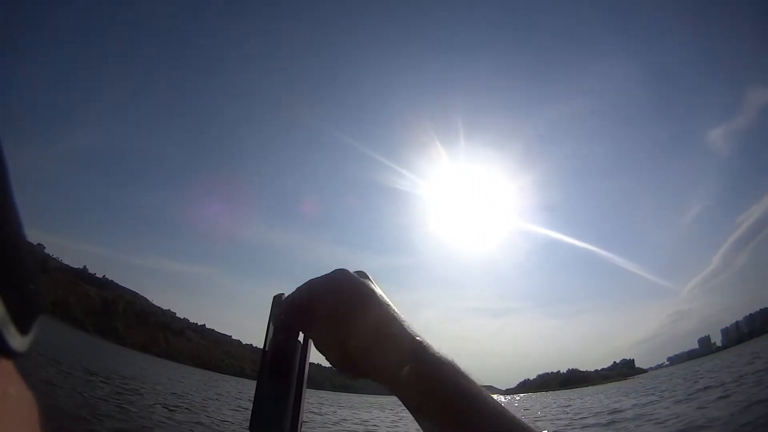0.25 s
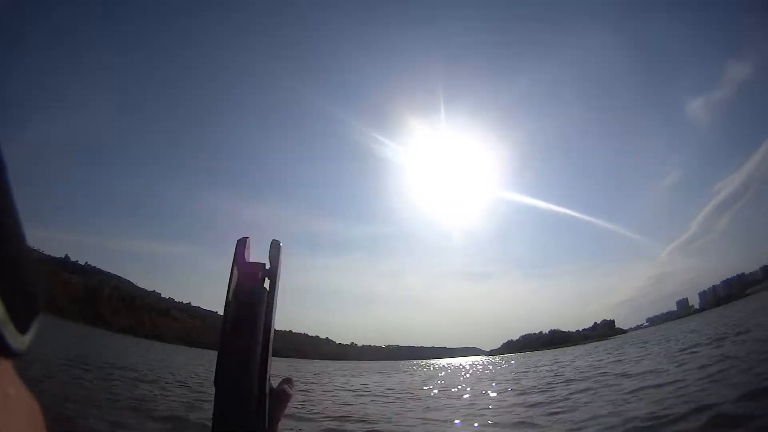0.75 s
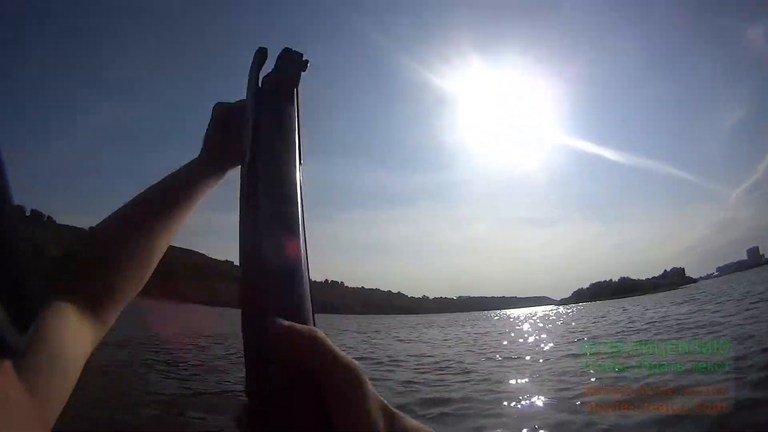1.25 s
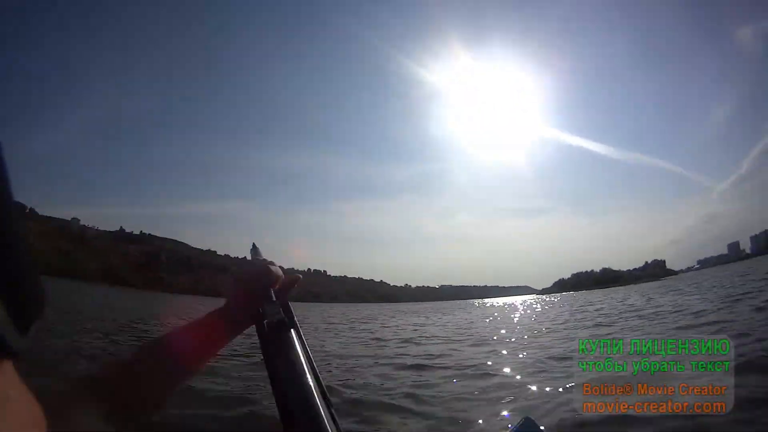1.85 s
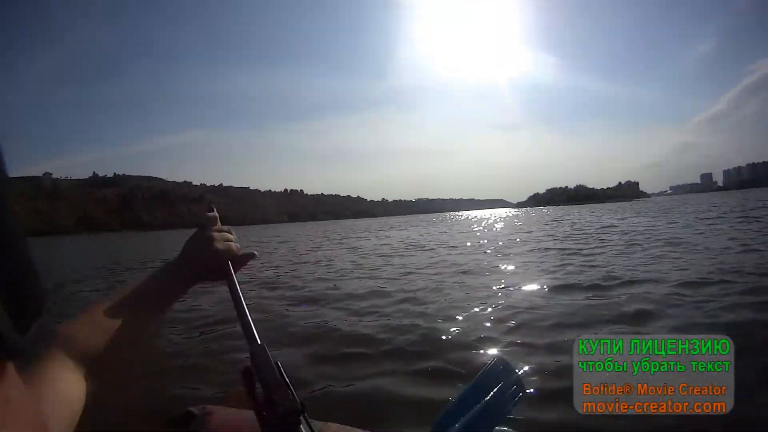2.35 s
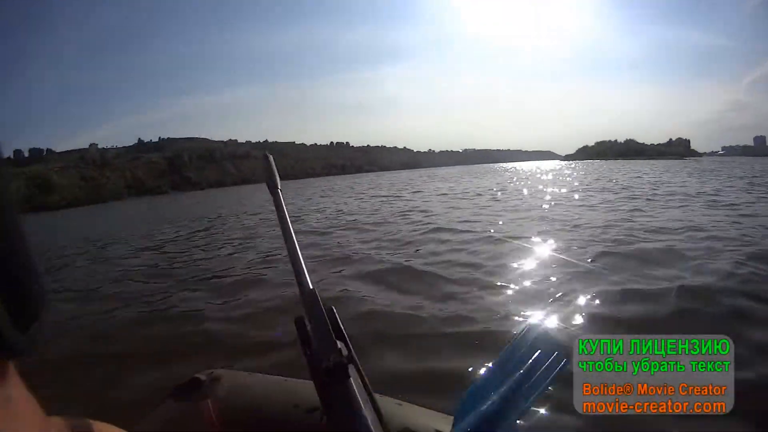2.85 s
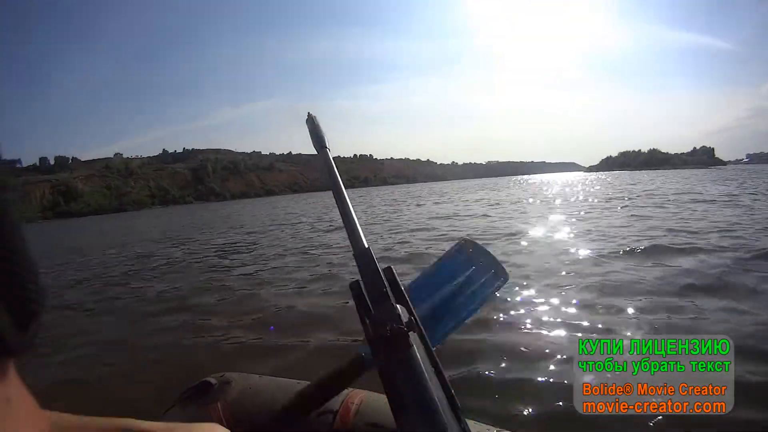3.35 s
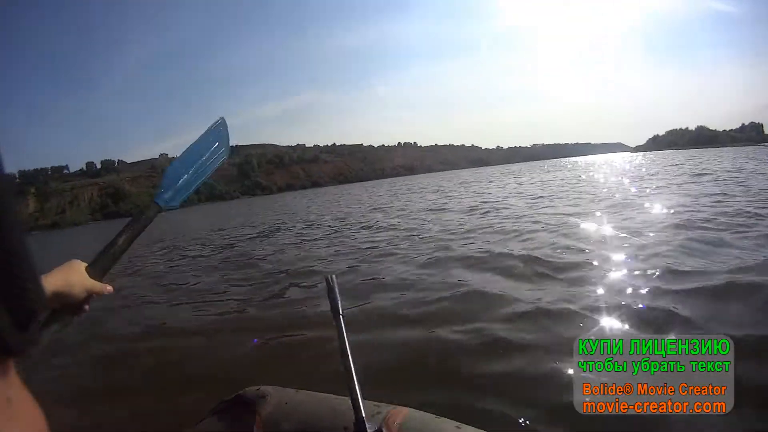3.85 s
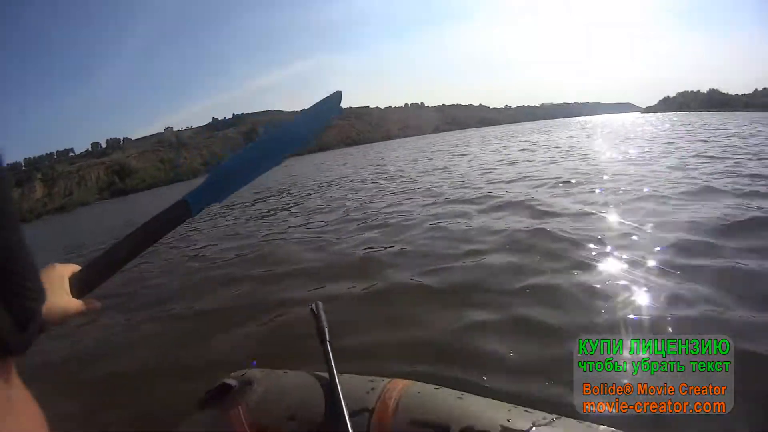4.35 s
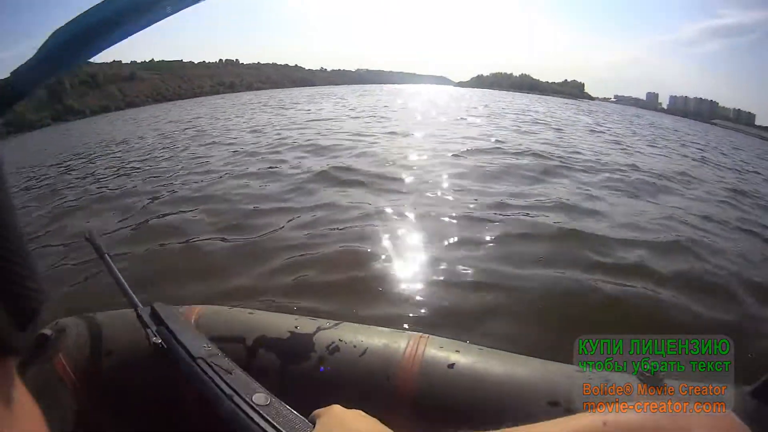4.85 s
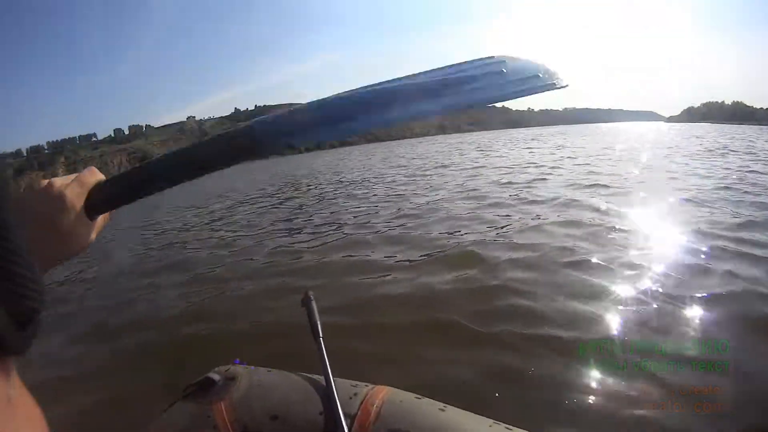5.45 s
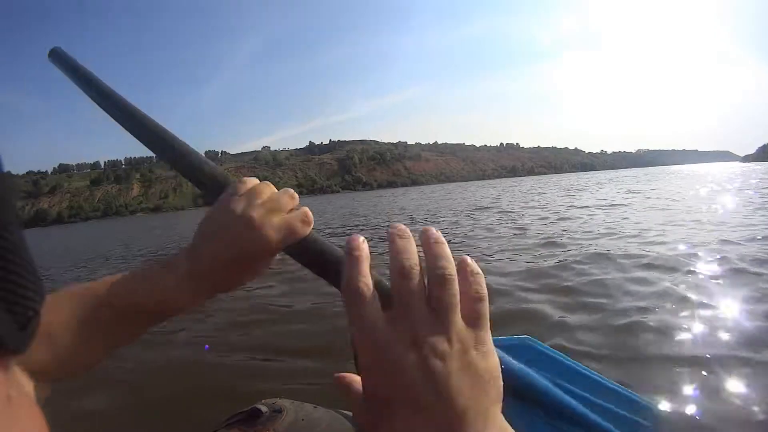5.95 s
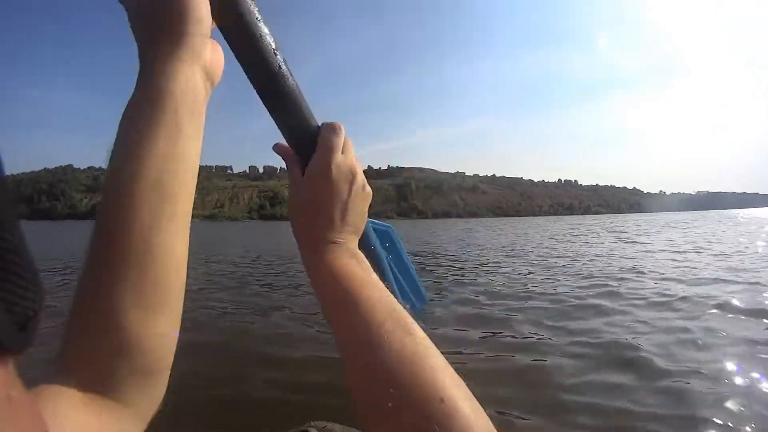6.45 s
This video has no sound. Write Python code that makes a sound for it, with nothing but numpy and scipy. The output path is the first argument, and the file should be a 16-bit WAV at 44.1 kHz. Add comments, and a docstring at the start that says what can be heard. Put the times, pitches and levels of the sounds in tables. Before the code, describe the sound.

A break-barrel rifle scrapes, snaps and clatters near the microphone on calm open water, followed by faint rubbing hands and soft hollow oar taps.

```python
"""First a faint hiss of open air, lapping ripples and a low hull rumble, in an inflatable boat on calm water.
Hands rub on gear, thin faint high tones flicker briefly, and close by a break-barrel air rifle is cocked,
snapped shut and laid on the hull: filtered noise bursts ring its steel modes, dense grains make the scrapes.
Then a plastic oar knocks lightly. Low thumps of the air tubes and the low body of some knocks are decaying
sines; air, water and rumble are shaped noise. All is heard at the two ports of a small head-worn camera."""
import sys
import numpy as np
from scipy import signal
from scipy.fft import rfft, irfft
from scipy.io import wavfile
from scipy.ndimage import uniform_filter1d

SR = 44100
rng = np.random.default_rng(int(sys.argv[2]) if len(sys.argv) > 2 else 0)


def bounce(signal):
    """Save signal as a 16-bit WAV file at the path given by the first command-line argument."""
    frames = np.transpose(np.atleast_2d(signal))
    limited = np.clip(frames, -1, 1)
    pcm = np.round(limited * 32767).astype(np.int16)
    wavfile.write(sys.argv[1], SR, pcm)


N = 295625
SIZE = 8192  # samples in one short event


def undb(db):
    """Decibels to gain."""
    return 10 ** (np.asarray(db) / 20)


def unit(x):
    """Scale to rms 1."""
    return x / np.sqrt(np.mean(x ** 2))


def freqs(size):
    """Frequencies in Hz of the bins of a spectrum, kept above zero for the log axis."""
    return np.maximum(np.fft.rfftfreq(size, 1 / SR), 1)


def across(rows, hz, axis=1):
    """One column of a table, read on a log-frequency axis."""
    rows = np.array(rows)
    return np.interp(np.log(hz), np.log(rows[:, 0]), rows[:, axis])


def add(out, s, x):
    """Mix a sound in at time s."""
    start = int(s * SR)
    out[..., start:start + x.shape[-1]] += x[..., :N - start]


def walk(rate):
    """Random levels drawn at this rate in Hz and smoothed twice, scaled to a spread near 1."""
    hold = int(SR / rate)
    steps = np.repeat(rng.standard_normal(N // hold + 1), hold)
    smooth = uniform_filter1d(uniform_filter1d(steps, hold), hold)
    return unit(smooth[:N])


def swells(rows, rise, point):
    """Gain over time of movements (t/s, length/s, level/dB) that build and ease; overlaps add in power.

    rise is the share of time spent building; point is the shape, 0 flat and 1 a sine arch.
    """
    power = np.zeros(N)
    for s, length_s, db in rows:
        t = np.arange(int(length_s * SR)) / SR
        progress = np.interp(t, [0, rise * length_s, length_s], [0, .5, 1])
        arch = abs(np.sin(np.pi * progress)) ** point
        add(power, s, (undb(db) * arch) ** 2)
    return np.sqrt(power)


def soft_pulse(level_db, peak_s):
    """A push that peaks at level_db after peak_s, then dies away with that same time constant."""
    t = np.arange(SIZE) / SR
    return undb(level_db) * t / peak_s * np.exp(1 - t / peak_s)


def grains(rate):
    """Dense tiny slips of uneven size, rate per second on average."""
    sizes = undb(2 * np.minimum(rng.exponential(size=N), 4))
    happens = rng.random(N) < rate / SR
    return unit(happens * sizes * rng.standard_normal(N))


# how alike diffuse sound is at the two microphone ports: f/Hz, correlation
PORT_LIKENESS = [(60, 0.89), (130, 0.83), (260, -0.084), (550, -0.48), (1160, -0.45), (2440, -0.29),
                 (5100, 0.2), (10700, 0.62)]


def diffuse(gain):
    """Coloured noise from all round the microphone, its two ports partly alike at each frequency."""
    likeness = across(PORT_LIKENESS, freqs(N))
    mid, side = rfft(rng.standard_normal((2, N))) * gain * np.sqrt([1 + likeness, 1 - likeness])
    return unit(irfft([mid + side, mid - side], N))


# a close source at the two microphone ports: f/Hz, left minus right level/dB, left lead/rad
NEAR_PORTS = [(150, -4, -0.88), (342, 0, -0.85), (614, 1, -1.92), (1160, -10, -1.37), (1890, -7, -0.64),
              (3120, 0.5, -0.61), (5960, -1.5, -0.59), (10700, 2, -0.93)]


def ports(hz):
    """Left and right response to a source just in front of the camera."""
    half_gain = undb(across(NEAR_PORTS, hz, axis=1) / 2)
    half = half_gain * np.exp(1j * across(NEAR_PORTS, hz, axis=2) / 2)
    return np.array([half, 1 / half]) / np.sqrt((abs(half) ** 2 + abs(half) ** -2) / 2)


def near(x, gain, apart):
    """Colour a close source and carry it to both ports, partly (apart) by unrelated paths."""
    scattered = rfft(abs(x) * rng.standard_normal((2, N)))
    arriving = rfft(x) * ports(freqs(N)) + apart * scattered
    return unit(irfft(arriving * gain, N))


def resonance(modes, hz):
    """Gain of a body whose modes (f/Hz, width/Hz, level/dB) add in power."""
    return np.sqrt(sum(undb(db) ** 2 / (1 + (2 * (hz - f) / width) ** 2) for f, width, db in modes))


def causal(gain):
    """The minimum-phase response with this gain: it rings only after it is struck."""
    cepstrum = irfft(np.log(gain + 1e-9))
    cepstrum[1:SIZE // 2] *= 2
    cepstrum[SIZE // 2 + 1:] = 0
    return np.exp(rfft(cepstrum))


def contact(decay_s, rise_s):
    """A broadband burst of micro-impacts that builds as two surfaces meet and dies as they settle."""
    t = np.arange(SIZE) / SR
    fade = np.exp(-t / decay_s) * (1 - np.exp(-t / rise_s))
    burst = rfft(rng.standard_normal(SIZE) * fade)
    flat = irfft(burst / (abs(burst) + 1e-9))  # equal strength at every frequency
    return unit(flat * np.sqrt(fade))


# edges between a blow's thud, knock, ring, snap and tick: f/Hz
BAND_EDGES = [150, 700, 1450, 3500, 6500, 11000]


def blow_bands(db, centre_hz, fall_db, thud_db, crown_octaves=.48):
    """Share a blow's level among the bands: a round-topped hump, higher up for a harder contact."""
    middles = np.sqrt(np.multiply(BAND_EDGES[:-1], BAND_EDGES[1:]))
    hump = undb(-fall_db * np.hypot(np.log2(middles / centre_hz), crown_octaves))
    hump[0] *= undb(thud_db)
    return undb(db) * hump / np.linalg.norm(hump)


def strike(blows, modes, thud_db, spot_db, contrast, rise, scatter_db, scatter_s, apart,
           tail_db, tail_s, tail_hz):
    """Each contact rings the body; the boat scatters it back; its hardness sets each band's strength."""
    out, hz, t = np.zeros((2, N)), freqs(SIZE), np.arange(SIZE) / SR
    peaks = np.array([resonance([mode], hz) ** 2 for mode in modes])
    bands = list(zip(BAND_EDGES, BAND_EDGES[1:]))
    # level inside each band, sliding to the next around their shared edge
    corners = np.log(np.array(bands) * [1.1, 1 / 1.1]).ravel()
    for s, decay_s, db, centre_hz, fall_db in blows:
        # each spot struck favours some modes; contrast deepens peaks and gaps
        weights = undb(spot_db * rng.standard_normal(len(modes))) ** 2
        body = causal(np.sqrt(weights @ peaks) ** contrast) * ports(hz)
        # first reflections share a part at both ports; later ones are duller and unrelated
        noise = rng.standard_normal((5, SIZE))
        early_noise = noise[0] + apart * noise[1:3]
        early = undb(scatter_db) * unit(early_noise * t * np.exp(-t / scatter_s))
        late = undb(tail_db) * unit(noise[3:] * np.exp(-t / tail_s))
        dull_late = rfft(late) / (1 + 1j * hz / tail_hz)
        ring = (rfft(contact(decay_s, rise * decay_s) + early) + dull_late) * body
        # band rms, averaged over the ports, as if the energy lasted 10 ms
        energy = [np.sum(abs(ring[:, (hz >= lo) & (hz < hi)]) ** 2) / SIZE for lo, hi in bands]
        rms = np.sqrt(np.array(energy) / (SR / 100))
        steps = np.log(blow_bands(db, centre_hz, fall_db, thud_db) / rms)
        colour = np.exp(np.interp(np.log(hz), corners, np.repeat(steps, 2)))
        low_cut = 1 + (BAND_EDGES[0] / hz) ** 3
        add(out, s, irfft(ring * causal(colour / low_cut)))
    return out


# colour of the open air, before scaling: f/Hz, relative level/dB
AIR_COLOUR = [(59, -32), (100, -4.5), (224, -5), (345, -5.5), (373, -4.5), (412, -4.5), (1120, -7.5),
              (1290, -6), (1870, -10.5), (3120, -10.5), (3450, -13.5), (5110, -15.5), (11000, -21),
              (14300, -105), (22000, -120)]


def air():
    """Open air over the water: a smooth, faint hiss from all round, its level drifting slightly."""
    level_db = -56 + 0.25 * walk(2.66)
    return undb(level_db) * diffuse(undb(across(AIR_COLOUR, freqs(N))))


# the boat rocking as weight shifts: t/s, length/s, rumble level/dB, lapping level/dB
BOAT_ROCKS = [(0., .75, -69, -70), (0.797, 0.71, -62.5, -57.5), (1.44, 0.35, -60, -56),
              (1.78, 0.56, -63, -57.5), (2.284, .32, -55, -55), (2.8, 0.52, -64.5, -58.5),
              (3.6, 0.51, -78, -65), (4.394, 0.21, -61.5, -66), (4.6, 1.2, -69, -60),
              (6.05, .4, -74, -62.5)]


def rocking(column, calm_db):
    """Swelling gain of one column of the rocking, joined in power to the calm level between rocks."""
    rows = [(row[0], row[1], row[column]) for row in BOAT_ROCKS]
    return np.hypot(undb(calm_db), swells(rows, rise=0.39, point=0.72))


# sloshes pushed out by the rocking hull: t/s, peak level/dB, time to peak and decay/s
HULL_SLOSHES = [(1.5, -56, 0.025), (1.572, -51, 0.015), (1.591, -50.5, .014), (2.362, -55, 0.015),
                (2.398, -50, 0.0091), (2.545, -54, 0.011), (5.245, -54.5, 0.0093)]
# colour of water close under the hull, before scaling: f/Hz, relative level/dB
WASH = [(100, -17), (300, -5.0), (650, 2.5), (1000, 1.5), (1280, 4.5), (1700, -2.5), (2400, -12.5),
        (5000, -25), (11000, -27)]


def water():
    """Ripples lap all round as flickering noise, and close sloshes burst in dense grains."""
    gain = undb(across(WASH, freqs(N)))
    surge = np.zeros(N)
    for s, db, peak_s in HULL_SLOSHES:
        add(surge, s, soft_pulse(db, peak_s))
    flicker = undb(0.85 * walk(18))
    ripples = rocking(column=3, calm_db=-65.5) * flicker * diffuse(gain)
    return ripples + surge * near(grains(rate=3000), gain, apart=0.17)


# low thumps of the air tubes and the low body of some knocks:
# t/s, f/Hz, envelope peak level/dB, time to peak and decay/s
LOW_THUMPS = [(1.588, 36, -48, 0.012), (1.621, 37.7, -45.5, 0.0078), (1.82, 49.3, -49.5, 0.0059),
              (1.835, 400, -49, .002), (1.978, 35, -48, 0.013), (2.326, 287, -40.5, 0.0027),
              (2.351, 42, -44, 0.015), (2.399, 45.4, -37, 0.0059), (4.955, 175, -52, 0.0056),
              (5.193, 178, -58, 0.0077)]
# colour of the hull's rumble, before scaling: f/Hz, relative level/dB
RUMBLE = [(10, -10), (25, -6), (38, -2.5), (55, -8.0), (90, -9), (140, -25), (300, -42), (1000, -86)]


def hull():
    """Decaying sines thump for the air tubes and the low body of some knocks; low noise swells as rumble."""
    thumps, t = np.zeros(N), np.arange(SIZE) / SR
    for s, hz, db, peak_s in LOW_THUMPS:
        add(thumps, s, -soft_pulse(db, peak_s) * np.sin(2 * np.pi * hz * t))
    rumble = diffuse(undb(across(RUMBLE, freqs(N))))
    return thumps + rocking(column=2, calm_db=-67) * rumble


# hands and sleeves rubbing on close gear, a row a stroke: t/s, length/s, level/dB before trim
RUB_STROKES = [(.365, 0.058, -59.5), (1.78, 0.25, -55), (2.785, 0.092, -56.5), (2.89, 0.14, -58.5),
               (3.03, 0.24, -63), (3.6, 0.73, -60), (4.35, .42, -57), (4.93, 0.57, -56.5), (6.5, 0.32, -60)]
# a palm sliding down the oar shaft: t/s, length/s, level/dB before trim
PALM_SLIDES = [(6.03, 0.084, -56.5), (6.12, 0.2, -54.5)]
# colours of the rubbing and of the sliding palm, before scaling: f/Hz, relative level/dB
CLOTH = [(300, -4.5), (900, 0.5), (1350, 5.0), (2200, 0), (3000, 5.5), (3700, 0.5), (4600, -1.0),
         (5250, 4.0), (6300, -4.5), (7700, -2), (11000, -14)]
SKIN = [(500, -12), (1400, 2), (2000, -1), (3200, 1.5), (4200, -2), (5300, 5), (6500, -1), (7900, 4.5),
        (9500, -3), (11000, -17)]


def hands():
    """Cloth and skin slip in dense tiny grains that swell with each stroke and flutter in level."""
    hz = freqs(N)
    shape = dict(rise=0.47, point=0.63)
    cloth = near(grains(rate=7000), undb(across(CLOTH, hz)), apart=0.3)
    skin = near(grains(rate=8000), undb(across(SKIN, hz)), apart=0.19)
    strokes = swells(RUB_STROKES, **shape) * cloth + swells(PALM_SLIDES, **shape) * skin
    return undb(-0.3) * strokes * undb(1.7 * walk(40))


# thin, faint high tones that flicker briefly: t/s, length/s, start f/Hz, end f/Hz, peak level/dB
FAINT_TONES = [(.53, .08, 3750, 3720, -66), (.605, .2, 4330, 4240, -68), (4.865, .085, 4290, 4250, -65)]


def thin_tones():
    """Faint, pure high tones that sag a little in pitch with a slight waver, equal at both ports."""
    out, t = np.zeros(N), np.arange(N) / SR
    for s, length_s, start_hz, end_hz, db in FAINT_TONES:
        progress = np.clip((t - s) / length_s, 0, 1)
        glide = start_hz + (end_hz - start_hz) * progress
        hz = glide * (1 + 0.0026 * walk(73))
        arch = np.sqrt(4 * progress * (1 - progress))
        out += undb(db) * arch * np.sin(2 * np.pi * np.cumsum(hz) / SR)
    return out


# the rifle's steel parts meeting, close to the microphone:
# t/s, chatter decay/s, level/dB before trim, strongest f/Hz, fall to either side/(dB per octave)
STEEL_BLOWS = [(.685, 0.006, -52.5, 1750, 7), (.7055, 0.005, -49, 4300, 4.5),
               (.8075, 0.003, -41.5, 4890, 7), (.8128, 0.0049, -39.5, 3800, 5),
               (.8215, .0034, -47, 3580, 9), (.8292, 0.0045, -38.5, 5000, 4),
               (.834, 0.0014, -44, 2200, 9.5), (.9843, .0061, -43, 3000, 12),
               (1.005, 0.005, -47.5, 3950, 9), (1.1165, 0.015, -46, 1640, 8), (1.143, 0.005, -47, 1590, 1),
               (1.2112, 0.0024, -47.5, 4470, 4), (1.365, 0.0024, -40, 3720, 11),
               (1.415, .0033, -44, 5980, 8), (1.4278, 0.0022, -43, 7130, 9),
               (1.4301, 0.0015, -19.5, 3620, 12), (1.434, 0.0017, -29, 3180, 8),
               (1.5914, 0.0033, -45, 780, 5.5), (1.6961, .0015, -49, 1830, 9),
               (1.8295, 0.00077, -46.5, 1030, 9), (1.8353, 0.0011, -34, 1450, 10.5),
               (1.9193, .0022, -35, 3000, 12), (2.2492, 0.0039, -18, 2900, 9),
               (2.3102, 0.0035, -31, 5000, 13), (2.3135, 0.0026, -18.5, 4700, 16),
               (2.3253, 0.0019, -19, 2760, 12), (2.3283, 0.0031, -18.7, 2500, 6.3),
               (2.336, 0.0025, -25, 2800, 9.4), (2.3398, 0.0074, -25, 1740, 7),
               (2.352, 0.012, -44, 5520, 3)]
# stock, spring housing and barrel, before contrast: f/Hz, width/Hz, relative level/dB
STEEL_MODES = [(320, 113, -11), (804, 86, 0), (913, 55, -1.5), (1090, 180, 1), (1286, 110, 2),
               (1468, 55, 3), (1667, 34, 5), (1753, 59, 2.5), (1795, 22, -4), (1920, 55, -1.5),
               (2287, 59, -2), (2490, 69, -1.5), (2740, 74, 1.5), (2920, 88, 2.5), (3100, 55, -1.5),
               (3430, 120, 1.5), (3730, 78, 2.5), (4130, 150, 0.5), (4500, 120, 2), (5010, 580, 10),
               (5480, 94, 7), (6070, 99, 2.5), (6240, 76, 2.5), (6650, 100, -6), (6450, 370, -3),
               (6950, 140, -4.5), (7770, 470, -3), (8870, 320, -2), (10100, 850, -13.5)]
# steel slipping in fits as the spring is compressed: t/s, length/s, level/dB before trim
SPRING_SLIPS = [(.855, 0.057, -54.5), (.958, .06, -48.5), (1.04, 0.14, -49.5), (1.14, 0.22, -55.5),
                (1.33, .1, -53)]
# the housing as the link scrapes along it, before contrast: f/Hz, width/Hz, relative level/dB
HOUSING_MODES = [(1230, 920, -10), (1660, 180, 2.5), (2690, 120, 0), (3140, 210, -1.5), (4510, 140, -1.5),
                 (5240, 230, 1.5), (6950, 180, -5.5), (8000, 1200, -9)]


def rifle():
    """The cocking link scrapes along the housing in fits; sear, barrel and latch clack home."""
    contrast = 1.16  # exponent on the body's gain
    clacks = strike(STEEL_BLOWS, STEEL_MODES, thud_db=-4, spot_db=3.5, contrast=contrast, rise=0.11,
                    scatter_db=-7.0, scatter_s=0.0021, apart=0.85,
                    tail_db=-12, tail_s=0.031, tail_hz=1600)
    scrape = near(grains(rate=2000), resonance(HOUSING_MODES, freqs(N)) ** contrast, apart=0.097)
    force = swells(SPRING_SLIPS, rise=0.42, point=0.39) * undb(1.4 * walk(90))
    return undb(-0.37) * clacks + undb(-1.5) * force * scrape


# oar and gear knocking on the boat, close to the microphone:
# t/s, chatter decay/s, level/dB before trim, strongest f/Hz, fall to either side/(dB per octave)
BOAT_KNOCKS = [(2.925, .0055, -53, 8000, 1), (3.0465, 0.0033, -49.5, 1370, 10),
               (3.2002, 0.0021, -47.5, 2950, 7.4), (3.4911, 0.0019, -54, 1270, 10),
               (3.8004, 0.0013, -46, 2900, 15), (4.1371, 0.0018, -47, 2350, 2.5),
               (4.4883, 0.011, -48, 1230, 6.5), (4.615, 0.0034, -45, 1200, 9),
               (4.7781, 0.0026, -55, 8000, 2.5), (4.9562, .0034, -42, 1720, 2.4),
               (4.9772, 0.0027, -45, 1880, 5.3), (5.0115, .0042, -50, 2900, 8),
               (5.1045, 0.0068, -44.5, 2380, 8), (5.1887, 0.0013, -41.5, 3500, 4.5),
               (5.1942, 0.00067, -42, 1620, 2), (5.2195, .0028, -47, 2040, 9),
               (5.351, .0015, -52, 3650, 14), (5.373, 0.0022, -57, 3450, 16),
               (5.8273, .0031, -56.5, 4900, 5), (5.953, .0035, -56, 1310, 9.3),
               (6.0502, .004, -53.5, 5300, 10), (6.078, .003, -54, 4900, 13),
               (6.277, 0.0016, -53.5, 1050, 9), (6.5766, 0.0014, -52, 5000, 3)]
# hollow shaft and plastic blade, before contrast: f/Hz, width/Hz, relative level/dB
SHAFT_MODES = [(182, 69, 5), (350, 120, 3.5), (467, 63, -16.5), (970, 69, -11), (1259, 41, 5),
               (1616, 89, 4.5), (1700, 30, -12), (2760, 50, -15), (2990, 190, -2), (4130, 470, 10),
               (5060, 1200, 9), (8200, 960, -2)]


def oar():
    """Light knocks ring the modes of the hollow shaft and plastic blade."""
    knocks = strike(BOAT_KNOCKS, SHAFT_MODES, thud_db=2.0, spot_db=2.0, contrast=1.06, rise=0.22,
                    scatter_db=-6.5, scatter_s=0.0046, apart=0.28,
                    tail_db=-5, tail_s=0.032, tail_hz=3550)
    return undb(0.54) * knocks


def scene():
    """Everything in and around the boat, in order of first sound."""
    return air() + water() + hull() + hands() + thin_tones() + rifle() + oar()


def record(dry):
    """The loudest peaks are rounded, and nothing is heard much above 11150 Hz."""
    top_cut = signal.ellip(10, .2, 70, 11150, fs=SR, output="sos")
    return signal.sosfilt(top_cut, np.tanh(dry))


dry = scene()
out = record(dry)
bounce(out)
```